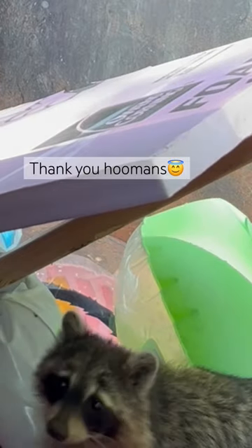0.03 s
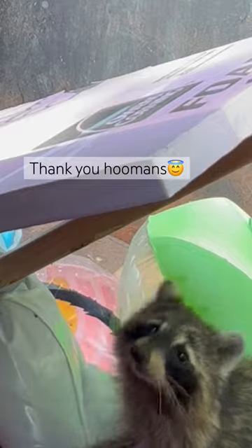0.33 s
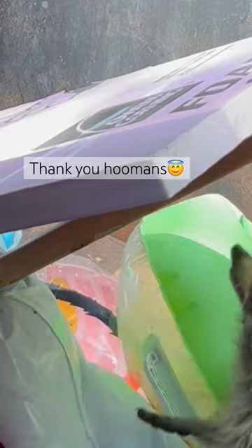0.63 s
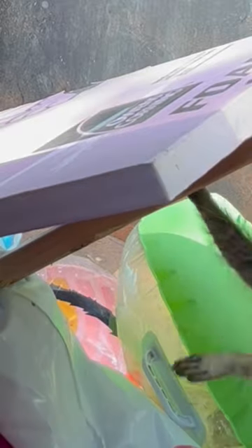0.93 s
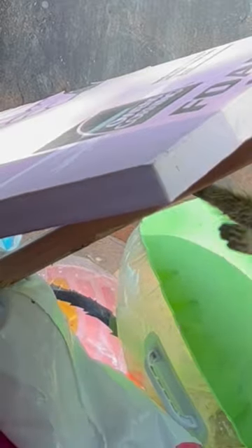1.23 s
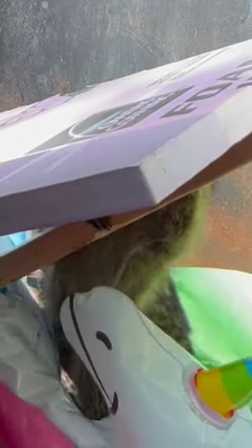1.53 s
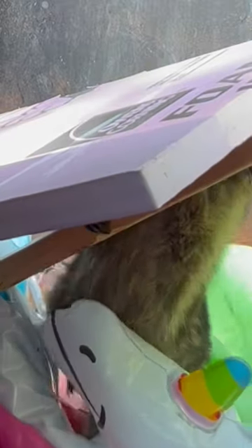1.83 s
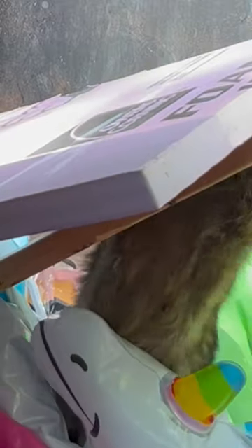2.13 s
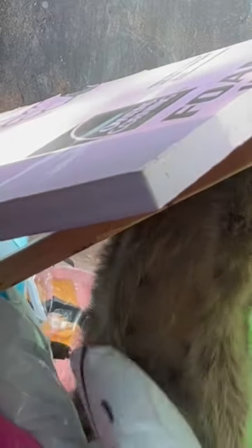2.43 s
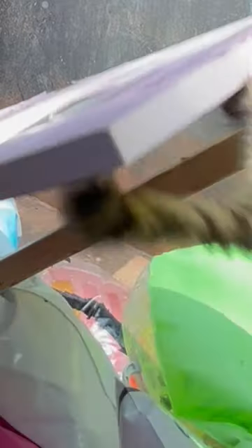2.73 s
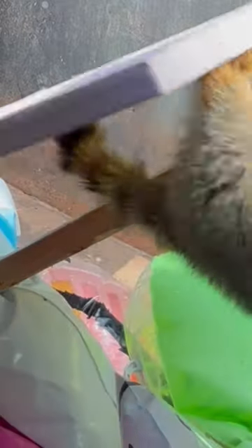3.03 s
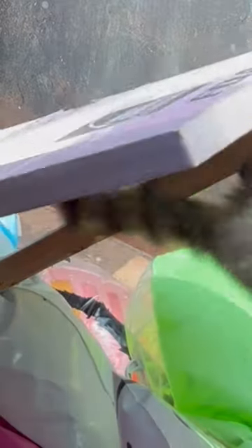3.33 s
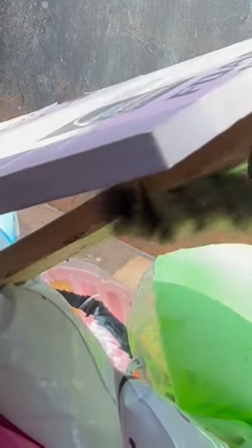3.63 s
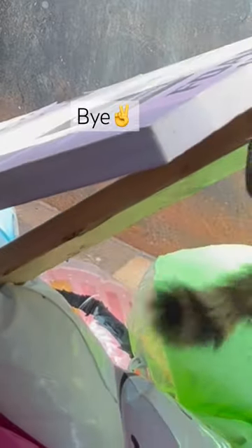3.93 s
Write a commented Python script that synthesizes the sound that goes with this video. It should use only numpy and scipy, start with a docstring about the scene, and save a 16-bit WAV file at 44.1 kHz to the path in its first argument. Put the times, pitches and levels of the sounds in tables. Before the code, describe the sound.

An animal clambers across plastic inflatables, rustling lightly at first, then skidding its claws and knocking a loose board with dull, hollow thuds. The sounds ring briefly between a dumpster's steel walls, above a quiet outdoor rumble.

```python
"""Over a low outdoor rumble, vinyl crinkles: a raccoon is shuffling on inflatables in a dumpster.
Creases snap under its body and its paws set the air chambers resonating. As it scrambles up past a
loose board, its claws skid by stick-slip friction and knocks excite the board's modes.
Reflections between the steel walls add a short ring; a phone's two microphone ports hear it all."""
import sys
import numpy as np
from scipy import signal
from scipy.fft import rfft, irfft
from scipy.io import wavfile
from scipy.ndimage import map_coordinates

SR = 44100
rng = np.random.default_rng(int(sys.argv[2]) if len(sys.argv) > 2 else 0)


def master(y):
    """Save y as 16-bit WAV."""
    cut = np.clip(np.atleast_2d(y).T, -1, 1)
    pcm = np.round(cut * 32767)  # scale
    wavfile.write(sys.argv[1], SR, pcm.astype(np.int16))


N = 176400
T = np.arange(N) / SR
HZ = np.fft.rfftfreq(2 * N, 1 / SR)
RING_T = T[:SR // 2]


def undb(db):
    """Amplitude ratio of a level in decibels."""
    return 10 ** (np.asarray(db) / 20)

def unit(x):
    """Normalisation to an rms of 1."""
    return x / np.sqrt(np.mean(x ** 2))

def curve(rows, column=1):
    """Linear interpolation of one column over time."""
    rows = np.array(rows)
    return np.interp(T, rows[:, 0], rows[:, column])

def shape(points):
    """Magnitude response through (Hz, dB) points on a logarithmic frequency axis."""
    hz, db = np.array(points).T
    return undb(np.interp(np.log(HZ + 1), np.log(hz), db))

def filtered(x, gain):
    """Filtering by multiplication of the spectrum."""
    return irfft(rfft(x, 2 * N) * gain)[:N]

def ring(x, response):
    """Convolution with an impulse response scaled to unit energy."""
    return signal.fftconvolve(x, response / np.linalg.norm(response))[:len(x)]

def decay(t60):
    """Exponential damping by 60 dB in t60 seconds."""
    return np.exp(-np.log(1000) * RING_T / t60)

def wander(rate):
    """Random modulation with a spread near 1, taking `rate` new values a second."""
    return np.interp(T * rate, np.arange(4096), rng.standard_normal(4096))

def slips(rate, spread_db):
    """Friction as a Poisson process: `rate` impulses a second, uneven in size and sign."""
    size = undb(spread_db * np.minimum(rng.exponential(size=N), 5))
    return unit((rng.random(N) < rate / SR) * size * rng.choice([-1, 1], N))

def stroke(t, length, rise_s, fall_s):
    """Contact envelope: linear rise, hold, exponential release."""
    return np.clip(t / rise_s, 0, 1) * np.exp(-np.maximum(t - length, 0) / fall_s)


# Outdoor rumble. Each row: frequency in Hz, relative spectral density in dB.
RUMBLE_SPECTRUM = [(20, 5), (75, 11), (150, -13), (600, -8), (4000, -31.5), (15000, -76)]

def outdoors():
    """Ambient noise, concentrated at low frequencies, wavers slightly in level."""
    rumble = unit(filtered(rng.standard_normal(N), shape(RUMBLE_SPECTRUM)))
    return rumble * undb(-56.5 + 0.5 * wander(6.4))


# The body's movements. Each row: time in seconds, relative crinkle and rub levels in dB.
SHUFFLE = [(0.0, -77.5, -72), (0.2, -80, -65), (0.69, -65.5, -57.5), (0.79, -72.5, -62.5),
           (1.36, -83, -71.5)]
CLIMB = [(1.38, -66, -60.5), (1.405, -57.5, -57.5), (1.515, -79, -62.5), (1.575, -72, -64),
         (1.60, -66, -55.5), (1.81, -57.5, -50.5), (1.86, -60.5, -56.5), (2.096, -66.5, -55),
         (2.35, -61, -53), (2.47, -55, -49.5)]
SCRAMBLE = [(2.59, -59, -49), (3.26, -59, -49.5), (3.83, -67, -54.5), (4.0, -97, -56)]
# The vinyl's two sounds. Each row: frequency in Hz, relative spectral density in dB.
CRINKLE_SPECTRUM = [(700, -8), (1800, 1.5), (5000, 3.5), (7500, -1.5), (15500, -11)]
RUB_SPECTRUM = [(100, -1), (260, 6), (500, 4), (850, -2.5), (1500, -8), (2500, -18.5), (5000, -40)]

def vinyl():
    """Buckling creases snap and fade over the duller sliding friction of fur and paws."""
    motion = list(SHUFFLE) + list(CLIMB) + list(SCRAMBLE)
    energy_decay_s = 0.019
    snaps = slips(rate=890, spread_db=7.0)
    energy = signal.lfilter([1], [1, -np.exp(-1 / (energy_decay_s * SR))], snaps ** 2)
    crinkle = np.sqrt(energy) * rng.standard_normal(N) * undb(3.0 * wander(28.13))
    rub = slips(rate=1800, spread_db=2.0) * undb(2.05 * wander(45))
    return (unit(filtered(crinkle, shape(CRINKLE_SPECTRUM))) * undb(curve(motion, column=1) + 3.5)
            + unit(filtered(rub, shape(RUB_SPECTRUM))) * undb(curve(motion, column=2) + 1.5))


# Swaying of the air chambers. Each row: time in seconds, relative level in dB.
SWAY = [(0.0, -72), (0.47, -63), (0.87, -65), (2.72, -48), (3.17, -37.5), (4.0, -53)]
# Their response. Each row: frequency in Hz, relative spectral density in dB.
CHAMBER_SPECTRUM = [(25, -9), (60, -8), (103, 1.5), (128, -9), (158, -1), (210, -15.5), (1000, -45.5)]
# Paw thumps. Each row: start in seconds, peak in dB, pitch in Hz, 60 dB decay time in seconds.
THUMPS = [(.325, -43, 99.8, 0.23), (0.468, -43, 92.5, 0.2), (1.481, -42, 95.6, 1), (1.798, -36, 167, 0.25),
          (2.044, -34.5, 193, 0.04), (2.596, -39, 129.6, 0.92), (2.67, -26.5, 124, 0.088),
          (3.153, -20, 93, 0.077), (3.229, -26.5, 148, 0.15), (3.27, -30.5, 103, 0.17),
          (3.359, -42, 156, 0.13), (3.837, -36, 128.4, 0.39)]

def inflatables():
    """Air chambers sway under the animal's weight and answer each paw as damped oscillators."""
    out = unit(filtered(rng.standard_normal(N), shape(CHAMBER_SPECTRUM))) * undb(curve(SWAY) + 3.5)
    push_s = 0.0016
    for at, db, hz, t60 in THUMPS:
        t = T - at
        envelope = stroke(t, 2 * push_s, rise_s=push_s, fall_s=t60 / np.log(1000))
        out += undb(db) * np.sin(2 * np.pi * hz * t) * envelope
    return out


# Knocks on the board and the plastic under it.
# Each row: start in seconds, length in seconds, relative level in dB, centre frequency in Hz.
KNOCKS = [(0.231, 0.032, -62.5, 770), (0.269, 0.014, -54.5, 493), (1.41, 0.0099, -51, 367),
          (1.794, 0.032, -42.5, 513), (2.037, 0.0031, -43, 288), (2.376, 0.01, -42, 330),
          (2.608, 0.015, -41, 1247), (2.705, 0.07, -37, 359), (2.799, 0.02, -35.5, 565),
          (2.991, 0.0074, -38, 577), (3.056, 0.01, -29.5, 855), (3.062, 0.021, -28, 396.6),
          (3.226, 0.016, -28.5, 249.4), (3.227, 0.016, -34, 516), (3.345, 0.0075, -23.5, 854),
          (3.361, 0.012, -37.5, 887), (3.356, 0.006, -28.5, 262), (3.457, 0.09, -45, 1247),
          (3.523, 0.028, -40, 1393), (3.662, 0.013, -47.5, 1723), (3.808, 0.0095, -51.5, 784),
          (3.918, 0.024, -43.5, 513), (1.533, 0.0035, -50.5, 480)]
# The board's modes. Each row: frequency in Hz, relative level in dB.
BOARD_MODES = [(258, 6.5), (392, 3), (520, 0.5), (740, 2), (812, -6.5), (937, -14), (1094, -1), (1755, -5)]

def board():
    """Impacts judder at a sagging pitch and excite the board's modes; higher modes damp sooner."""
    lowest_hz, lowest_t60_s = BOARD_MODES[0][0], 0.14
    pitch_sag, pure_above_db, crack_db, ring_db = 0.16, -27.5, -18, -1
    t, out = RING_T, np.zeros(2 * N)
    modes = sum(undb(db) * np.cos(2 * np.pi * hz * t) * decay(lowest_t60_s * np.sqrt(lowest_hz / hz))
                for hz, db in BOARD_MODES)
    for at, length, db, hz in KNOCKS:
        push = stroke(t, length, rise_s=0.0024, fall_s=0.0057) * np.exp(-t / 0.028)
        chatter = push * rng.standard_normal(len(t))
        hollow = signal.lfilter(*signal.iirpeak(hz, Q=1.67, fs=SR), chatter)
        pitch = hz * (1 + pitch_sag * (np.exp(-t / length) - .5))
        flex = push * np.sin(2 * np.pi * (np.cumsum(pitch) / SR + rng.random()))
        purity = .5 + undb(db - pure_above_db)  # harder knocks are more tonal
        judder = unit(unit(hollow) + purity * unit(flex)) + undb(crack_db) * unit(chatter)
        knock = unit(judder + undb(ring_db) * unit(ring(hollow, modes)))
        start = int(at * SR)
        out[start:start + len(t)] += knock * np.sqrt(np.mean(push ** 2)) * undb(db + 3.5)
    return out[:N]


# Claw skids. Each row: start in seconds, length in seconds, relative level in dB.
SKIDS = [(0.346, 0.005, -72), (0.402, 0.0044, -66), (0.488, 0.0087, -67.5), (0.534, 0.008, -64.5),
         (0.682, 0.011, -54.5), (0.717, 0.007, -53), (0.762, 0.0036, -70), (1.482, 0.0043, -66.5),
         (1.583, 0.011, -65.5), (2.445, 0.023, -56.5), (2.566, 0.051, -48), (2.664, 0.029, -37.5),
         (2.696, 0.042, -29.5), (2.755, 0.037, -33), (2.788, 0.024, -33), (2.945, 0.017, -47),
         (2.985, 0.012, -43), (3.047, 0.029, -34.5), (3.076, 0.055, -46.5), (3.194, 0.038, -40),
         (3.222, 0.016, -31.5), (3.331, 0.042, -32), (3.391, 0.048, -49), (3.438, 0.017, -38),
         (3.664, .016, -57.5), (3.807, 0.01, -61.5)]
# Claw friction. Each row: frequency in Hz, relative spectral density in dB.
CLAW_SPECTRUM = [(300, 4), (900, -1), (2000, -2.5), (2800, -4), (3500, -3.5), (5150, 0), (6200, 4),
                 (7800, 1), (10000, -6), (12500, -1), (15500, -13)]
# Modes of the scraped plastic. Each row: frequency in Hz, relative level in dB.
SHEET_MODES = [(2025, -2), (3500, 5), (5160, 8), (7600, 3)]
# The long scrape: start and end in seconds.
SCRAPE_S = (2.69, 2.82)

def claws():
    """Stick-slip friction makes gritty skids; in the long scrape it drives the plastic's modes."""
    force = sum(undb(db + 3) * stroke(T - at, length, rise_s=min(0.021, length / 2), fall_s=0.011)
                for at, length, db in SKIDS)
    grit = slips(rate=5000, spread_db=0.2) * undb(1.43 * wander(350))
    modes = sum(undb(db) * np.cos(2 * np.pi * hz * RING_T) for hz, db in SHEET_MODES) * decay(t60=0.046)
    scraping = (T > SCRAPE_S[0]) & (T < SCRAPE_S[1])
    resonance = ring(force * scraping * unit(grit), modes)
    warped_s = T + 0.0009 * wander(35)  # the pitches shift as the plastic bends
    singing = map_coordinates(resonance, [warped_s * SR])
    return force * unit(filtered(grit, shape(CLAW_SPECTRUM))) + undb(-5.5) * singing


# One paw squeak: start in seconds, length in seconds, relative level in dB.
SQUEAK = (1.393, .019, -50.5)
# Its two partials, in Hz.
SQUEAK_HZ = (2450, 3500)

def squeak():
    """Friction-induced vibration: a paw on the vinyl sounds two partials with rough pitch."""
    at, length, db = SQUEAK
    pitches = [hz * (1 + .025 * wander(693.6)) for hz in SQUEAK_HZ]
    tone = sum(np.sin(2 * np.pi * np.cumsum(hz) / SR) / k for k, hz in enumerate(pitches, 1))
    return undb(db) * tone * stroke(T - at, length, rise_s=0.021, fall_s=0.0038)


# One long drag of the body: start in seconds, length in seconds, level in dB.
DRAG = (1.70, .105, -48)

def drag():
    """Sliding friction swells as the body leans into the vinyl, then lets go."""
    at, length, db = DRAG
    force = undb(db) * stroke(T - at, length, rise_s=length, fall_s=0.0038)
    return force * unit(filtered(slips(rate=1000, spread_db=5.5), shape(RUB_SPECTRUM)))


def steel_walls(x):
    """Reverberation: dense reflections between the dumpster's walls add a short ring."""
    reflections = rng.standard_normal(len(RING_T)) * decay(t60=0.18)
    return x + undb(-9) * ring(x, reflections)


# Phase between the ports. Each row: frequency in Hz, lead of the left port in radians.
PORT_PHASE = [(0, 0), (600, -.9), (1500, -.6), (2840, 2.6), (3600, 1.3), (5100, 1.5), (6000, 3.14),
              (16000, 17.6)]
# Their balance. Each row: frequency in Hz, left minus right level in dB.
PORT_BALANCE = [(60, -0.5), (200, -3), (700, -6.5), (1300, -.5)]
# Sound they do not share. Each row: frequency in Hz, relative level in dB.
PORT_UNSHARED = [(100, -14), (900, -5), (1800, -8.5), (3500, -2.5), (6500, -39)]

def ports(direct, scattered):
    """Spaced ports hear direct sound at unequal phase and level; scattering lowers their coherence."""
    lead = np.exp(1j * np.interp(HZ, *np.array(PORT_PHASE).T))
    balance, unshared = shape(PORT_BALANCE), shape(PORT_UNSHARED)
    equal_power = np.sqrt(2 / (1 + balance ** 2) / (1 + unshared ** 2))
    side = filtered(scattered, unshared)
    left = filtered(direct + side, balance * lead * equal_power)
    right = filtered(direct - side, equal_power)
    return np.array([left, right])

def scene():
    """Superposition: contacts arrive directly and scattered by clutter, over chambers and rumble."""
    direct, scattered = (vinyl() + drag() + squeak() + claws() + board() for _ in range(2))
    direct, scattered = steel_walls(direct), steel_walls(scattered)
    return ports(direct + inflatables() + outdoors(), scattered)


# Brief dips in level, each given by its centre in seconds.
DIP_TIMES = [1.355, 2.569]

def record(dry):
    """The level dips twice, briefly, and the phone's low-pass filter limits the bandwidth."""
    depth_db, width_s, cutoff_hz = -20, 0.010, 15400
    dip_db = depth_db * sum(np.exp(-((T - at) / width_s) ** 2) for at in DIP_TIMES)
    lowpass = signal.ellip(10, .2, 80, cutoff_hz, fs=SR, output="sos")
    return signal.sosfilt(lowpass, dry * undb(dip_db))


dry = scene()
out = record(dry)
master(out)
```